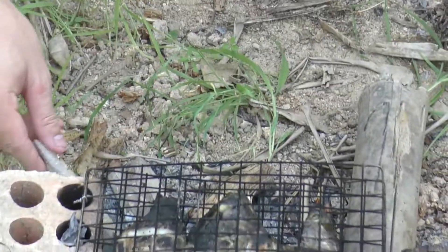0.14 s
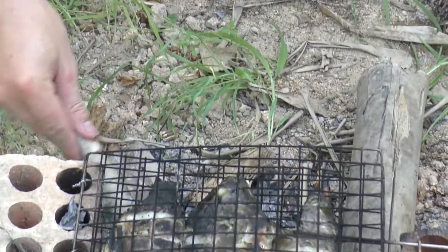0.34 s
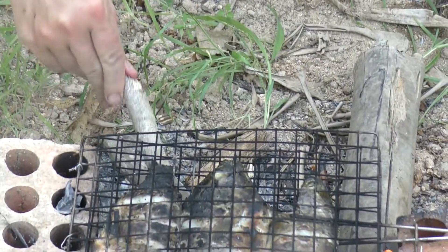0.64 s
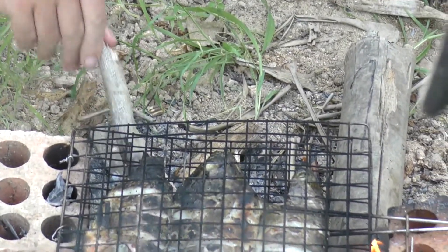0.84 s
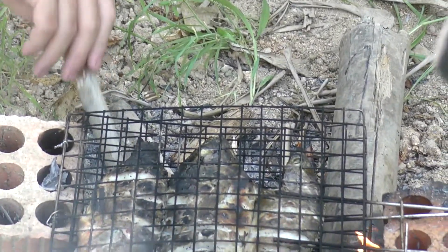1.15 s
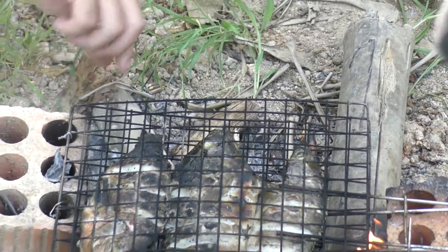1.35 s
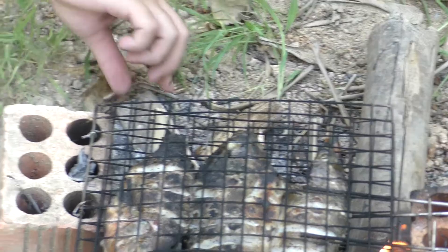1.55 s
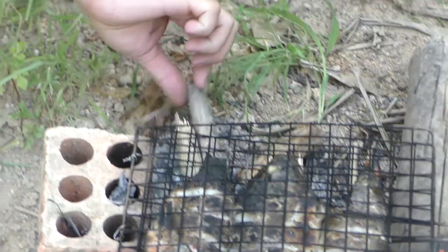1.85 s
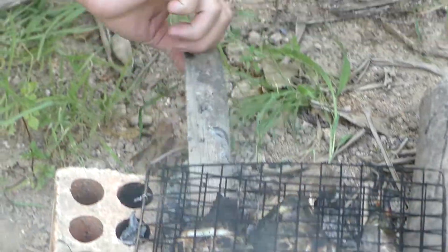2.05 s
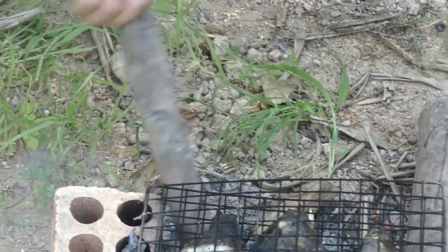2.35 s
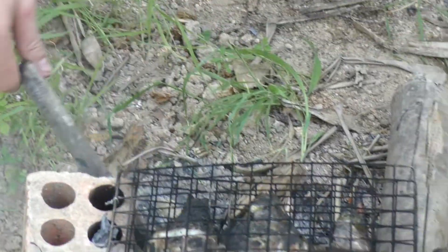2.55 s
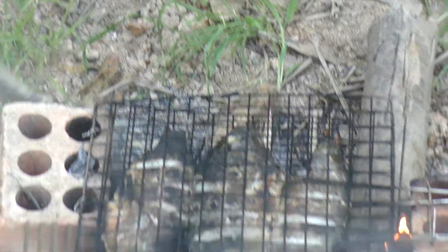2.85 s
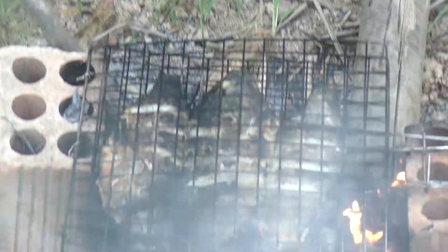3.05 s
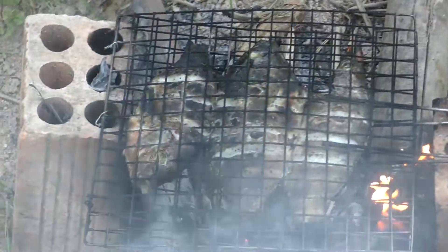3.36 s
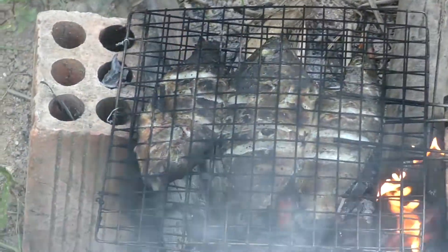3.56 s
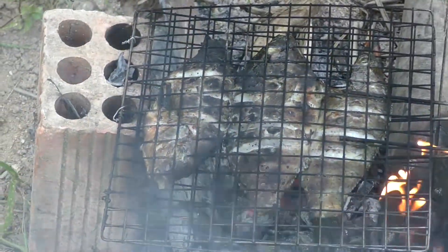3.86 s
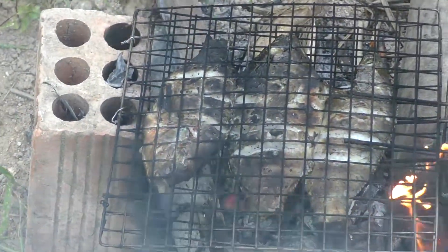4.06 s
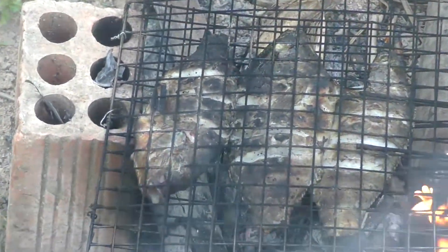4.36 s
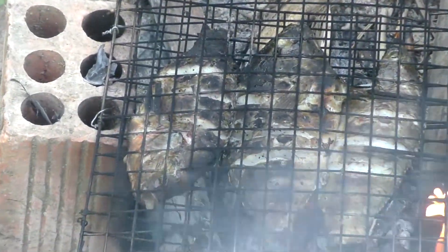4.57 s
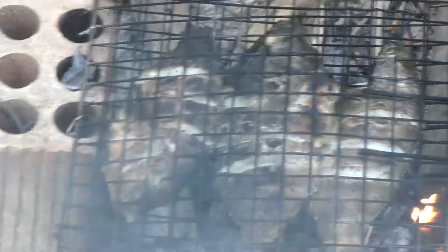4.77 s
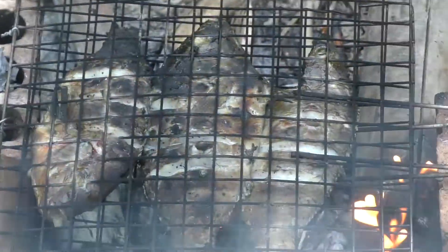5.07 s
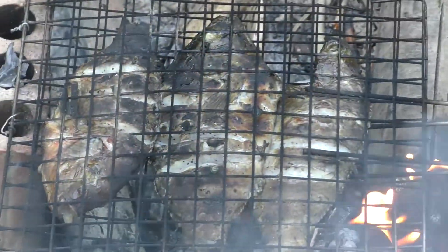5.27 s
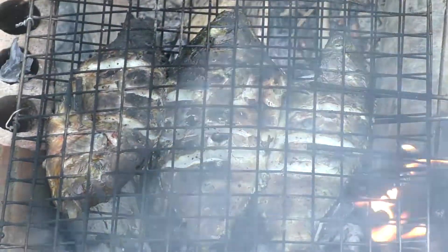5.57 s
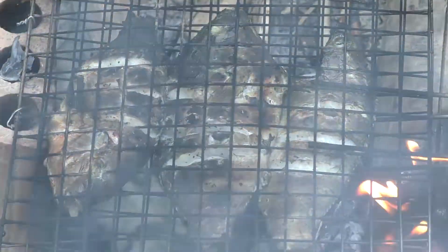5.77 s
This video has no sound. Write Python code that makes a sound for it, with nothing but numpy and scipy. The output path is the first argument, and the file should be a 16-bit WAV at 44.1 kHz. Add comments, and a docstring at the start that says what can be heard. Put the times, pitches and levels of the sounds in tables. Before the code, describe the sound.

High-pitched cicadas buzz outdoors, one cutting off midway, as a small wood fire gives scattered sharp pops over a faint low hum.

```python
"""A cicada rasps close to the microphones, its ribbed drum clicking fast, then breaks off. A second one
buzzes on in short pulsed phrases over a far insect chorus. We are outdoors beside a small wood fire:
sticks pop, ring and scrape, embers tick, and something squeaks thinly. Underneath lie a hum, a rumble
and a far motor, all to the right, where the stereo pair hears more bass."""
import sys
import numpy as np
from scipy import signal
from scipy.fft import rfft, irfft, next_fast_len
from scipy.io import wavfile
from scipy.ndimage import uniform_filter1d, map_coordinates

SR = 44100
rng = np.random.default_rng(int(sys.argv[2]) if len(sys.argv) > 2 else 0)


def dump(signal):
    """Clip the signal to [-1, 1] and save it as 16-bit WAV at the path in sys.argv[1]."""
    limited = np.clip(np.atleast_2d(signal).T, -1, 1)
    pcm = np.round(limited * 32767).astype(np.int16)
    wavfile.write(sys.argv[1], SR, pcm)


N = 260631

# The near cicada's drum at rest. Each row: resonance in Hz, width in Hz, gain in dB.
DRUM_MODES = [(5277, 210, -6), (5520, 170, -10.5), (6053, 170, -0.5), (6244, 330, -2), (6773, 250, 0),
              (6980, 270, 0.5), (7177, 130, -1), (7500, 260, -7.5), (7830, 130, -13), (8440, 116, -11),
              (9370, 340, -21), (10160, 400, -27), (11500, 500, -24.5)]
# The broad body of its rasp. Each row: frequency in Hz, relative density in dB.
RASP_SPECTRUM = [(2350, -35), (4000, -26.5), (4850, -15), (5080, -6), (5350, 0.5), (7030, -4), (8340, -10),
                 (8820, -16), (10000, -21.5), (11900, -26), (12800, -26.5), (15000, -30.5), (15600, -40)]
# The second cicada's buzz. Each row: resonance in Hz, width in Hz, gain in dB.
BUZZ_MODES = [(4660, 130, -14), (5400, 300, -8), (5850, 170, 0), (6230, 220, -13), (6740, 220, -4),
              (7200, 500, -18), (10580, 300, -24), (11320, 300, -22), (11720, 250, -24)]
# Its phrases. Each entry: start in seconds.
PHRASE_STARTS_S = [-.18, .15, .475, .8, 1.13, 1.455, 1.78, 2.11, 2.435, 2.762, 3.092, 3.425, 3.743, 4.065,
                   4.403, 4.73, 5.052, 5.376, 5.708]
# Pops in the fire. Each row: start in seconds, gain in dB, own pitch in Hz, body note in Hz,
# relative thud in dB, relative stick modes in dB, their tilt in dB per octave.
FIRE_POPS = [(.7741, -37.5, 2250, 590, -18, 2, 2), (.8179, -36.5, 2270, 550, -10, 0, 0),
             (1.0329, -24.5, 1360, 590, -25, -9, -4), (1.0822, -29, 1530, 550, -7, -7, 4),
             (1.372, -26, 2300, 740, -19, -6, 1), (1.7409, -5.5, 2180, 770, -12.5, 2, -5),
             (2.0633, -15, 3150, 845, -14.5, -3, 1), (2.162, -28, 2370, 570, -14, 1, 3),
             (2.1869, -21, 1470, 650, -23, -3, 0), (2.5262, -27, 1180, 745, -3, -4, -6),
             (2.6309, -30, 2050, 560, -19, -4, 1), (2.803, -12.5, 2840, 590, -19, -2, 3),
             (2.8082, -18, 1280, 710, -10, -2, -4), (2.8968, -32, 1890, 570, -3, -3, -2),
             (3.037, -31, 1730, 590, -17, 2, -10), (3.1715, -30, 3230, 580, -5, 0, -2),
             (3.2191, -30, 3030, 570, -17, 2, 1), (3.2879, -16.5, 2860, 550, -28, 2, 5),
             (3.3058, -12, 2070, 985, -16, -1, 5), (3.3144, -19, 1410, 1000, -23, -1, -3),
             (3.787, -26, 2900, 700, -21, 3, 3), (3.8117, -25, 2900, 730, -22, -4, -1),
             (3.8752, -5, 2274, 684, -17, -2, -8), (3.8972, -23.5, 1330, 730, -14, 0, -4),
             (4.157, -29, 2760, 550, -20, 0, 6), (4.1759, -30, 1150, 650, -19, -2, 1),
             (4.1929, -24, 2750, 680, -19, 0, -4), (4.2382, -15, 2950, 740, -11, 1, -2),
             (4.2752, -27, 2960, 630, -18, -1, 3), (4.3326, -25, 2060, 730, -15, -2, 5),
             (4.3413, -24, 2730, 580, -22, 2, -3), (4.377, -29.5, 3040, 980, -9, 0, -5),
             (4.9592, -13, 2280, 640, -9, 3, -2), (5.6111, -27, 2260, 565, -15, -3, 3)]
# How the sticks ring. Each row: mode in Hz, gain in dB.
STICK_MODES = [(1310, -10), (1680, -9), (2270, -7.5), (3050, -7), (3750, -17.5), (4450, -19)]
# The ground under the sticks. Each entry: mode in Hz.
GROUND_MODES_HZ = [270, 420]
# Sticks settling. Each row: start and length in seconds, gain in dB, band in Hz, relative treble in dB.
STICK_SCRAPES = [(.05, 0.074, -52.5, 2240, -25), (.385, 0.14, -43, 2900, -25),
                 (1.733, 0.0048, -39, 2500, -30), (1.745, 0.04, -42.5, 2240, -25),
                 (1.98, 0.027, -48, 1500, -25), (2.065, 0.028, -41.5, 2250, -18),
                 (2.13, 0.12, -43.5, 2260, -20), (2.806, 0.033, -35.5, 2060, -4.5),
                 (2.85, 0.021, -44, 2500, -25), (3.115, 0.094, -49, 3200, -20),
                 (3.288, .006, -35, 3200, -4), (3.304, 0.024, -29.5, 3000, -3),
                 (3.34, 0.019, -50, 2800, -18), (3.47, 0.059, -48.5, 2300, -20),
                 (3.79, 0.042, -42.5, 1800, -20), (3.893, .025, -40, 1500, -25),
                 (4.03, 0.038, -46.5, 2000, -18), (4.155, 0.07, -45, 2400, -22),
                 (4.245, 0.036, -38, 2200, -2.5), (4.325, 0.037, -39.5, 2280, -3),
                 (4.37, .025, -43, 2500, -22), (4.74, 0.039, -46.5, 2270, -20),
                 (4.965, 0.047, -41.5, 1990, -18), (5.585, 0.098, -46, 2300, -18),
                 (5.73, 0.13, -43.5, 1900, -22)]
# The embers' ticking. Each row: time in seconds, relative level in dB.
EMBER_LEVELS = [(0.0, -52), (0.35, -52), (1.04, -54.5), (1.79, -54), (1.92, -50), (2.12, -48), (2.27, -50),
                (3.18, -48), (3.32, -46), (3.56, -50), (3.74, -50), (4.05, -46), (4.69, -49.5),
                (5.04, -44.5), (5.37, -47), (5.91, -44.5)]
# Its colour. Each row: frequency in Hz, relative density in dB.
EMBER_SPECTRUM = [(400, -41), (900, -5.5), (1400, -1.5), (2300, -0.5), (3200, -3.5), (4500, -9), (8000, -7),
                  (13000, -15.5), (15700, -38)]
# Thin squeaks. Each row: start in seconds, length in seconds, relative level in dB.
SQUEAK_EVENTS = [(3.785, 0.13, -32), (5.352, .13, -42), (5.53, .05, -49), (5.59, .1, -41)]
# Insects in the distance. Each row: frequency in Hz, relative density in dB.
CHORUS_SPECTRUM = [(2500, -43), (3600, -29), (4650, -14.5), (4900, -9.5), (5700, -3.5), (6000, -4.5),
                   (6250, 1), (6450, -6), (6750, -2), (7200, -5.5), (8660, -17.5), (9570, -20.5),
                   (10600, -15), (10950, -17), (11350, -14), (12200, -20), (13400, -36), (15600, -41)]
# The low bed. Each row: time in seconds, relative levels in dB of the rumble and of flames and air.
RUMBLE_AIR_LEVELS = [(0.0, -41.5, -42), (0.16, -39.5, -43), (0.28, -44, -42), (0.56, -39, -44.5),
                     (1.0, -44, -45.5), (1.4, -38, -44), (1.43, -43.5, -44.5), (3.47, -32.5, -39),
                     (3.75, -37.5, -40), (5.71, -35, -41), (5.84, -41, -40), (5.91, -32, -42)]
# The rumble's colour. Each row: frequency in Hz, relative density in dB.
RUMBLE_SPECTRUM = [(12, -41), (20, -11), (53, -15), (75, 1.5), (92, 4.5), (170, -11.5), (220, -33),
                   (370, -120)]
# The breath of flames and air. Each row: frequency in Hz, relative density in dB.
AIR_SPECTRUM = [(82, -51), (140, -2.5), (226, -4), (370, -5.5), (502, -7.5), (966, -15), (1910, -21.5),
                (2050, -22.5), (2240, -24.5), (3950, -27), (4500, -20.5), (5850, -42), (9900, -120)]
# The low hum. Each row: time in seconds, relative level in dB.
HUM_LEVELS = [(0.0, -63), (0.18, -43.5), (0.49, -48), (0.61, -60), (0.67, -43), (0.77, -50), (0.97, -38),
              (1.18, -37), (1.33, -46), (1.73, -35.5), (2.09, -46), (2.3, -35.5), (4.07, -31), (4.86, -39),
              (5.13, -36), (5.69, -40.5), (5.86, -35), (5.91, -42)]
# A motor far off. Each row: time in seconds, pitch in Hz, relative level in dB.
MOTOR_RUN = [(0, 80.5, -43), (.9, 80, -45), (1.9, 81, -41), (2.5, 85, -40), (3.2, 85, -38), (3.8, 86, -41),
             (4.4, 90, -42), (5.1, 91, -36), (5.91, 90, -41)]
# Two fuzzy low tones. Each row: centre in Hz, width in Hz.
DRONE_BANDS = [(119, 9.1), (215, 15.8)]
# Their swells. Each row: time in seconds, relative levels in dB of the lower and the upper tone.
DRONE_LEVELS = [(0.0, -56, -50), (0.05, -46, -49), (0.54, -52, -47), (0.57, -44, -55), (1.13, -53, -53),
                (2.75, -43, -50), (2.93, -38, -39), (3.09, -41, -50), (3.44, -36, -41), (3.61, -40, -49),
                (4.97, -44, -51), (5.91, -40, -49)]
# How alike the background arrives at the two microphones. Each row: frequency in Hz, correlation.
PAIR_LIKENESS = [(60, 0.95), (130, 0.8), (290, 0.44), (640, 0.71), (1410, 0.22), (3100, 0.4), (6820, 1),
                 (15000, 0.44)]
# The pair's balance. Each row: frequency in Hz, left minus right in dB.
PAIR_BALANCE = [(60, -8.0), (150, -5.5), (380, -3.5), (950, -1.5), (2380, 0.0), (5980, 0.0), (15000, -5.5)]
# Stereo width by pitch: wide near 5.5 kHz, nearly centred at 7-8 kHz.
# Each row: frequency in Hz, gain of the left-right difference in dB.
STEREO_WIDTH = [(100, 0.5), (1000, 0.5), (2000, -1.5), (4000, 0), (5500, 2.5), (6500, -7), (7500, -16),
                (8600, -4), (10500, 2.5), (15000, -6)]


def near_cicada(start_db=-29.1, sag_db_per_s=.7, stop_s=2.545, fade_s=.054):
    """Close by: uneven clicks of the drum ribs ring its resonances; the insect tires and breaks off."""
    t = np.arange(N) / SR
    settle_percent = np.exp(-t / .25)  # the pitch first sinks a little
    tighten_percent = 2.6 * np.clip(t - .6, 0, stop_s)  # then climbs as the drum tightens
    speed = 1 + (tighten_percent + settle_percent) / 100
    ribs = clicks(rate=625, jitter=.3, scatter_db=3.5) + .44 * rng.standard_normal(N)
    band = lambda hz: 1 / (1 + (4800 / (hz + 1)) ** 20) / (1 + (hz / 12000) ** 8)
    drum = filtered(ribs, lambda hz: resonances(DRUM_MODES, hz) * band(hz))
    drum = unit(map_coordinates(drum, [np.cumsum(speed)], order=5))
    body = coloured(clicks(rate=700, jitter=.4, scatter_db=-1) + rng.standard_normal(N), RASP_SPECTRUM)
    falter_db = 1.5 * np.clip((t - 1.81) / .17, 0, 1) * wobble(14)  # unsteady before the end
    flutter_db = .82 * wobble(9.68) + .44 * wobble(18)
    level = amp(start_db - sag_db_per_s * t + falter_db + flutter_db)
    singing = np.clip((stop_s - t) / fade_s, 0, 1)
    return with_echoes((drum + amp(-4.5) * body) * level * singing, wet_db=-4, t60=.19)


def pulsing_cicada(pulse_s=.0367, phrase_s=.285):
    """A second cicada: its rib clicks come in pulses that quicken and run together, then pause."""
    t, effort = np.arange(N) / SR, np.zeros(N)
    for start in PHRASE_STARTS_S:
        age = t - start
        db = np.interp(start, [.82, 2.6], [-44.4, -34.4])  # the first phrases are softer
        quickening = 1.4 * np.clip(age - .15, 0, 1) ** 2 / .022
        pulse = np.sin(np.pi * (age / pulse_s + quickening)) ** 2
        fused = np.clip((age - .15) / .12, 0, .7)
        gate = np.clip(np.minimum(age / .0092, (phrase_s - age) / .052), 0, 1)
        effort += amp(db) * (fused + (1 - fused) * pulse ** 1.27) * gate
    ribs = clicks(rate=421, jitter=.06, scatter_db=1) * (1 + .1 * np.sin(2 * np.pi * 104 * t))
    ribs += .7 * rng.standard_normal(N)
    band = lambda hz: 1 / (1 + (4200 / (hz + 1)) ** 8) / (1 + (hz / 12400) ** 16)
    buzz = unit(filtered(ribs, lambda hz: resonances(BUZZ_MODES, hz) * band(hz)))
    return with_echoes(buzz * effort * amp(.24 * wobble(24.8)), wet_db=-6, t60=.13)


def fire_pops(stray_from_s=1.8, crack_t60=.008):
    """At the fireside: each pop snaps, rings the stick and thuds on the ground; faint strays join in."""
    t, pops = np.arange(SR // 10) / SR, np.zeros(N + SR)
    sine = lambda hz: np.sin(2 * np.pi * hz * t)
    strays = [(stray_from_s + (N / SR - stray_from_s) * when, -40 + 6 * force,
               1200 + 2000 * pitch, 550 + 350 * note, -12, 0, 0)
              for when, force, pitch, note in rng.random((10, 4))]
    for start, db, pitch_hz, body_hz, thud_db, stick_db, tilt_db in FIRE_POPS + strays:
        stick = [(hz, gain + stick_db + tilt_db * np.log2(hz / 2200)) for hz, gain in STICK_MODES]
        ground = [(hz, thud_db) for hz in GROUND_MODES_HZ]
        wood = sum(amp(gain + rng.normal(0, 2)) * sine(hz * rng.normal(1, .025))
                   for hz, gain in stick + ground)  # no two pops strike the modes alike
        wood += amp(thud_db + 6.5) * sine(body_hz)  # the stick's hollow body note
        ring_t60 = .023 * amp(-.5 * stick_db)  # a purer tap rings longer
        ring = (.93 * wood + .6 * sine(pitch_hz)) * amp(-60 * t / ring_t60)
        crack = uniform_filter1d(rng.standard_normal(len(t)), size=4)
        crack *= amp(-21 + 2.5 * tilt_db - 60 * t / crack_t60)  # bright pops snap harder
        onset = 1 - np.exp(-(t / .0005) ** 2)  # wood gives way softly: little treble
        pops[round(start * SR):][:len(t)] += amp(db) * onset * (ring + crack)
    return with_echoes(pops[:N], wet_db=-11, t60=.05)


def stick_scrapes():
    """Sticks shift in the fire: short strokes of dry, uneven grit with a fizz on top."""
    grit = rng.standard_normal(N + SR) * amp(np.pad(4 * wobble(600) + 3 * wobble(90), (0, SR)))
    scrapes = np.zeros(N + SR)
    for start, length, db, hz, treble_db in STICK_SCRAPES:
        span = slice(round(start * SR), round((start + length + .032) * SR))
        age = np.arange(span.stop - span.start) / SR
        attack = np.clip(age / (.041 * length), 0, 1)
        release = amp(-60 * np.clip(age - .77 * length, 0, 1) / (length + .022))
        body = signal.lfilter(*signal.butter(2, [hz / 1.8, hz * 1.51], "band", fs=SR), grit[span])
        fizz = signal.lfilter(*signal.butter(2, 5000, "high", fs=SR), grit[span])
        scrapes[span] += amp(db) * attack * release * (unit(body) + amp(treble_db) * unit(fizz))
    return filtered(scrapes[:N], lambda hz: 1 / (1 + (hz / 13500) ** 12))


def embers():
    """The ember bed ticks all along: noise broken into fine grains."""
    level_db, = curves(EMBER_LEVELS)
    grains = rng.standard_normal(N) * amp(4.9 * wobble(150) + 2.4 * wobble(30))
    return amp(level_db - 4.5) * coloured(grains, EMBER_SPECTRUM)


def squeaks(slips_per_s=52, fade_db_per_s=80, attack_s=.018, release_s=.025):
    """Thin, broken squeaks: stick-slip pulses in one narrow resonance, fading as they go."""
    t, level = np.arange(N) / SR, np.zeros(N)
    for start, length, db in SQUEAK_EVENTS:
        age = np.clip(t - start, 0, 1)
        gate = np.clip(np.minimum(age / attack_s, (length - age) / release_s), 0, 1)
        level += amp(db - fade_db_per_s * age) * gate
    tone = narrow_noise(centre_hz=3010, width_hz=260) * amp(-1 + 2.5 * wobble(60))
    slips = .25 + np.sin(np.pi * slips_per_s * t + .6 * wobble(15)) ** 2
    return with_echoes(tone * level * slips, wet_db=-11, t60=.04)


def far_chorus():
    """Distant insects merge into one gently wavering hiss."""
    return amp(-39 + .87 * wobble(5.95)) * ambient_noise(CHORUS_SPECTRUM)


def rumble_and_air():
    """A deep rumble under the soft breath of flames and air, both unsteady."""
    rumble_db, air_db = curves(RUMBLE_AIR_LEVELS)
    rumble = amp(rumble_db - 3.5 + .65 * wobble(23)) * ambient_noise(RUMBLE_SPECTRUM)
    air = amp(air_db + 1.5 + 1.3 * wobble(10)) * ambient_noise(AIR_SPECTRUM)
    return rumble + air


def hum(hz=59.85):
    """A mains-like hum that swells and dips."""
    level_db, = curves(HUM_LEVELS)
    return amp(level_db + 2.5) * np.sin(2 * np.pi * hz * np.arange(N) / SR + .25 * wobble(4.02))


def far_motor():
    """A motor in the distance: one wavering tone that climbs as it slowly speeds up."""
    hz, level_db = curves(MOTOR_RUN)
    level = amp(level_db + 1.2 + 2.2 * wobble(9))
    return level * np.sin(2 * np.pi * np.cumsum(hz) / SR + .7 * wobble(8))


def drone():
    """Two fuzzy low tones swell and sink in the background."""
    return sum(amp(db - 3.5) * narrow_noise(*band) for db, band in zip(curves(DRONE_LEVELS), DRONE_BANDS))


def with_echoes(source, wet_db, t60):
    """A centred source with echoes off trees and ground, partly different at each microphone."""
    t = np.arange(SR // 4) / SR
    decays = rng.standard_normal((3, len(t))) * amp(-60 * t / t60)
    shared, separate = decays[0], decays[1:]
    tails = (shared + .91 * separate) / np.linalg.norm(shared)
    return source + amp(wet_db) * signal.fftconvolve(source[None], tails, axes=1)[:, :N]


def ambient_noise(spectrum):
    """Noise from all around, partly alike at the two microphones, at rms 1."""
    def mid_side_gains(hz):
        angle = np.arccos(np.clip(along(PAIR_LIKENESS, hz), -1, 1)) / 2
        return amp(along(spectrum, hz)) * [np.cos(angle), np.sin(angle)]
    mid, side = filtered(rng.standard_normal((2, N)), mid_side_gains)
    return unit(np.array([mid + side, mid - side]))


def clicks(rate, jitter, scatter_db):
    """A train of rate clicks a second, at rms 1: jitter in periods, sizes scattered."""
    timing, size = rng.standard_normal((int(N * rate / SR), 2)).T
    at = (np.arange(len(timing)) + jitter * timing) * SR / rate
    return unit(np.bincount(np.clip(at, 0, N - 1).astype(int), amp(scatter_db * size), N))


def narrow_noise(centre_hz, width_hz):
    """Noise passed twice through one resonance, at rms 1."""
    response = lambda hz: resonances([(centre_hz, width_hz, 0)], hz) ** 2
    return unit(filtered(rng.standard_normal(N), response))


def resonances(table, hz):
    """The complex response of (Hz, width Hz, dB) resonances, summed with alternating signs."""
    return sum((-1) ** k * amp(db) * 1j * hz * width / (centre ** 2 - hz ** 2 + 1j * hz * width)
               for k, (centre, width, db) in enumerate(table))


def coloured(x, spectrum):
    """x shaped by (Hz, dB) points, at rms 1."""
    return unit(filtered(x, lambda hz: amp(along(spectrum, hz))))


def filtered(x, response):
    """x through a complex response of frequency."""
    size = next_fast_len(N + SR // 2)
    return irfft(rfft(x, size) * response(np.fft.rfftfreq(size, 1 / SR)), size)[..., :N]


def wobble(rate):
    """A smooth random curve, rate knots a second."""
    return map_coordinates(rng.standard_normal(int(N * rate / SR) + 4), [np.arange(N) * rate / SR])


def curves(rows):
    """One value per sample for each column after the time."""
    times, *columns = np.transpose(rows)
    return [np.interp(np.arange(N) / SR, times, column) for column in columns]


def along(points, hz):
    """(Hz, value) points joined on a log axis."""
    knots_hz, values = np.transpose(points)
    return np.interp(np.log(hz + 1), np.log(knots_hz + 1), values)


def amp(db):
    """Decibels to amplitude."""
    return 10 ** (np.asarray(db) / 20)


def unit(x):
    """x at rms 1."""
    return x / np.sqrt(np.mean(x ** 2) + 1e-20)


def scene():
    """Both cicadas, the background and the fire as they reach the microphones."""
    cicadas = near_cicada() + pulsing_cicada()
    background = hum() + far_chorus() + rumble_and_air() + far_motor() + drone()
    fire = fire_pops() + with_echoes(stick_scrapes() + embers(), wet_db=-4, t60=.14)
    return cicadas + fire + squeaks() + background


def record(dry):
    """The bass leans right, the sound is wider at some pitches than others, and ends at top_hz."""
    top_hz = 15750
    balance = lambda hz: amp(np.outer([.5, -.5], along(PAIR_BALANCE, hz)))
    left, right = filtered(dry, lambda hz: balance(hz) * (hz < top_hz))
    side = filtered(left - right, lambda hz: amp(along(STEREO_WIDTH, hz)))
    return np.array([left + right + side, left + right - side]) / 2


dry = scene()
out = record(dry)
dump(out)
```